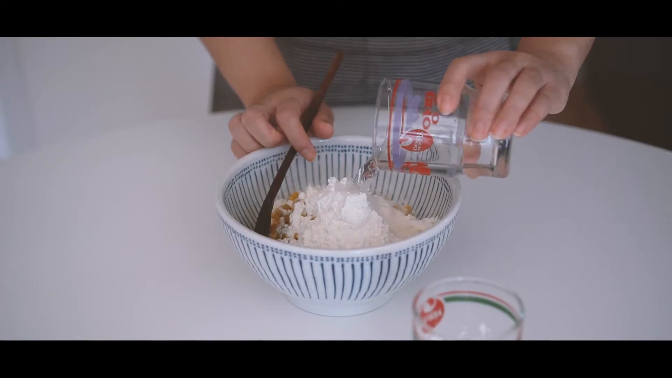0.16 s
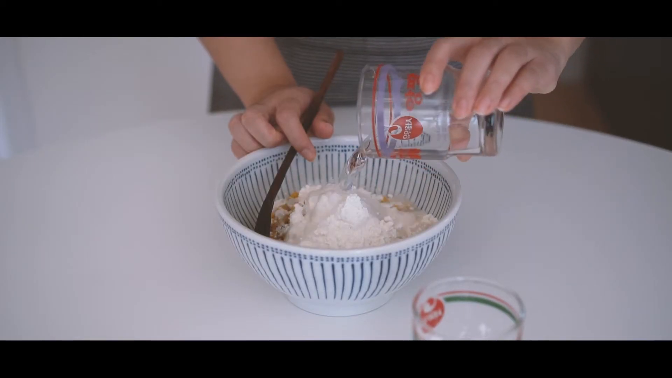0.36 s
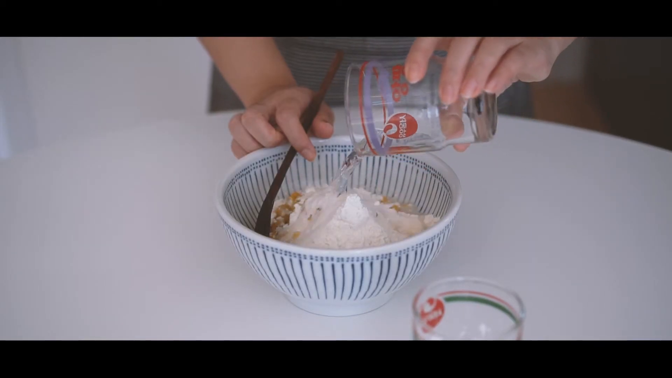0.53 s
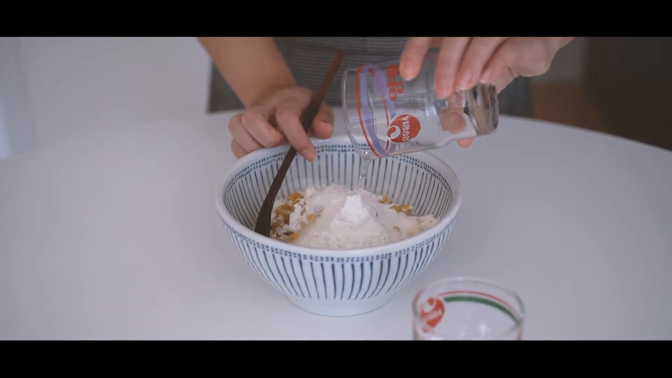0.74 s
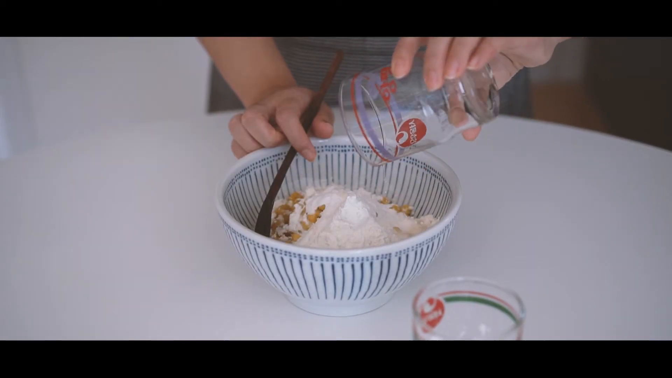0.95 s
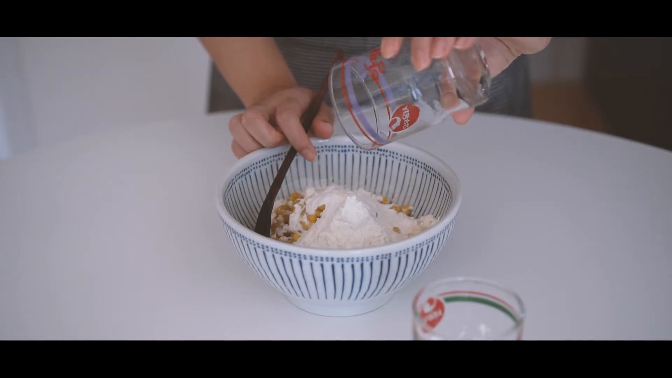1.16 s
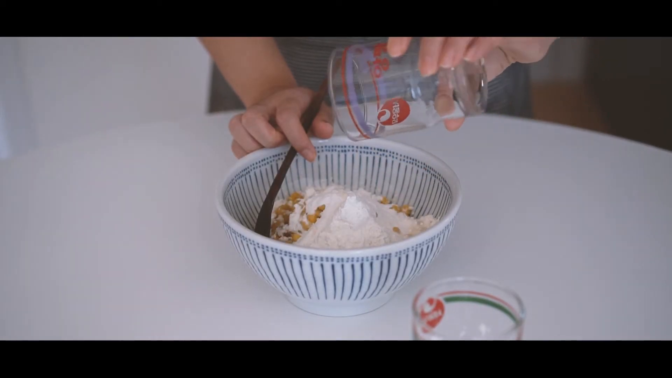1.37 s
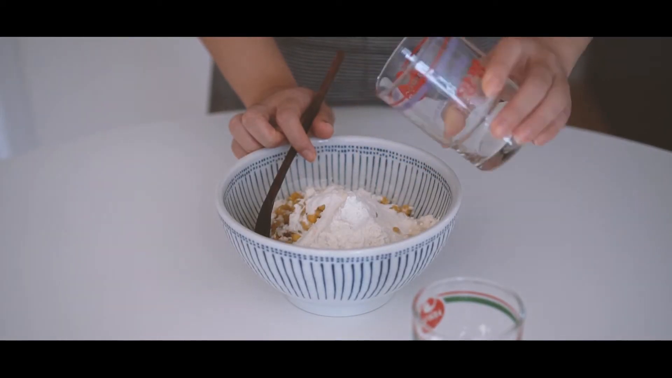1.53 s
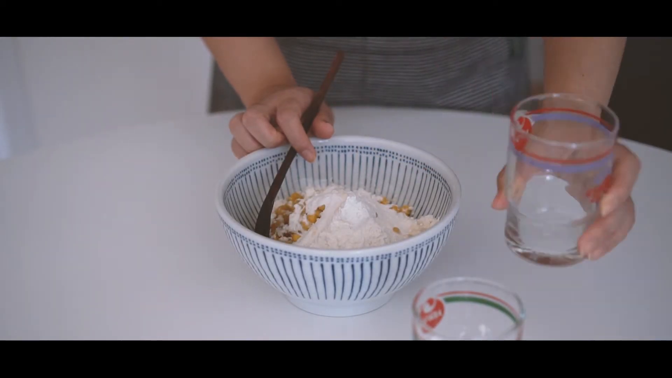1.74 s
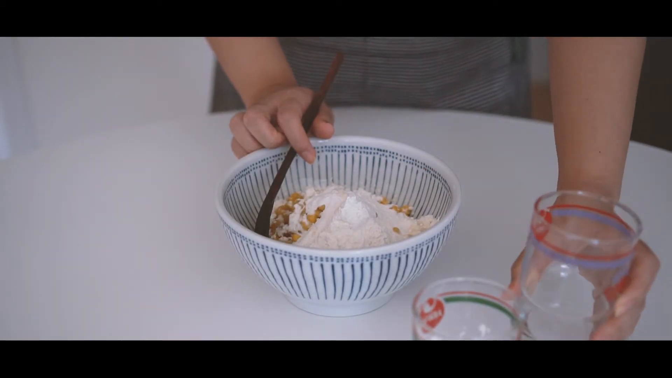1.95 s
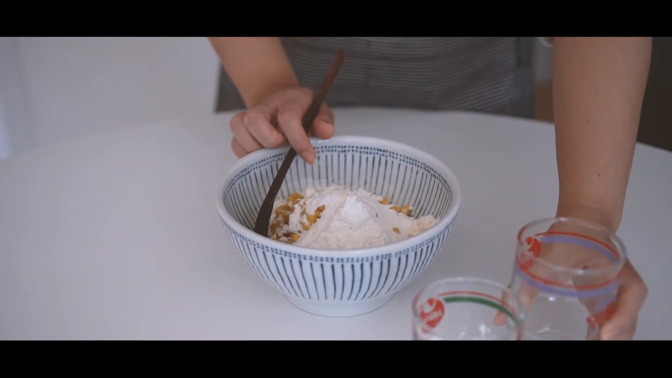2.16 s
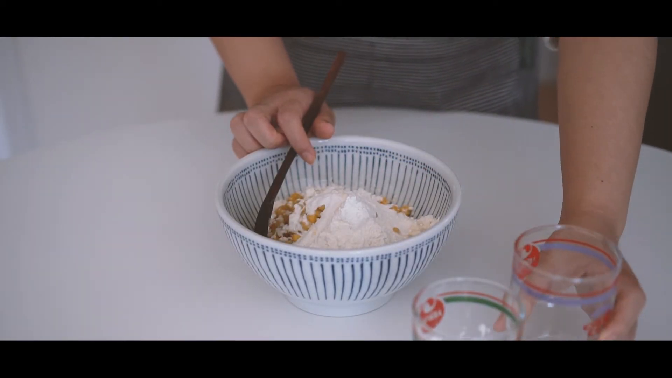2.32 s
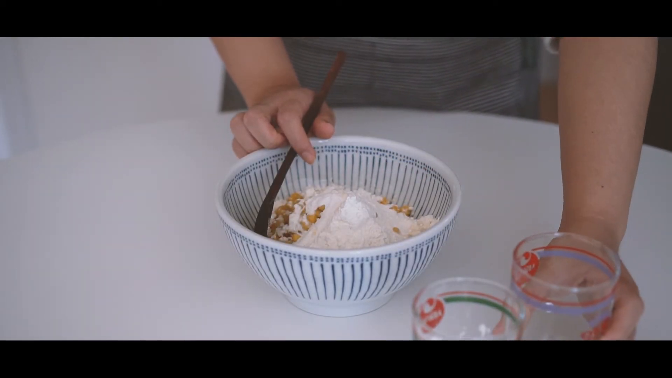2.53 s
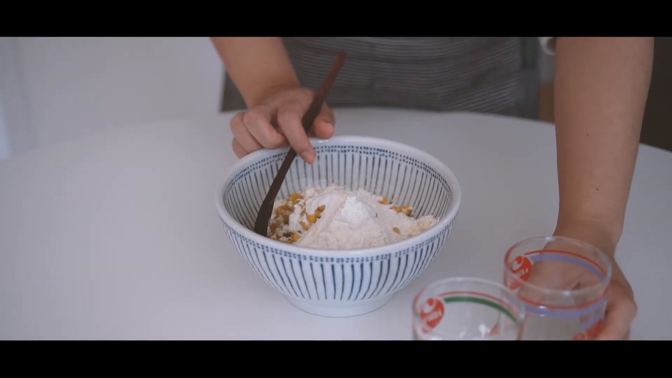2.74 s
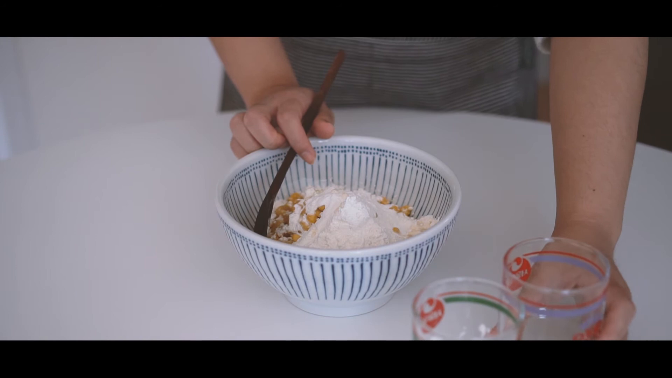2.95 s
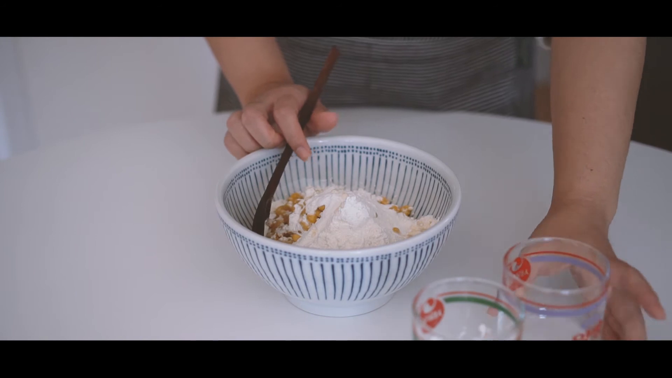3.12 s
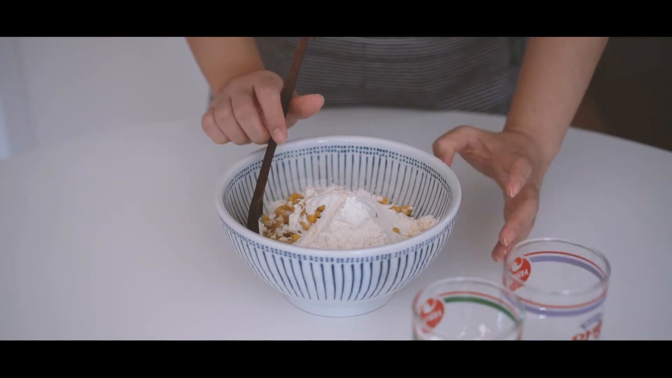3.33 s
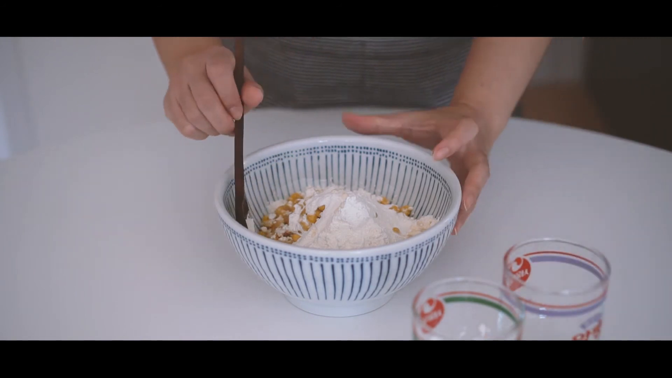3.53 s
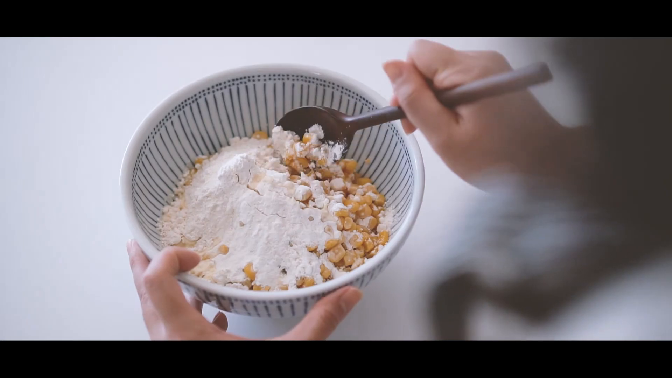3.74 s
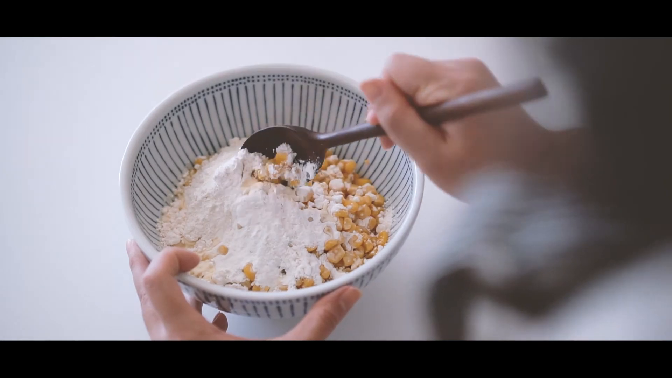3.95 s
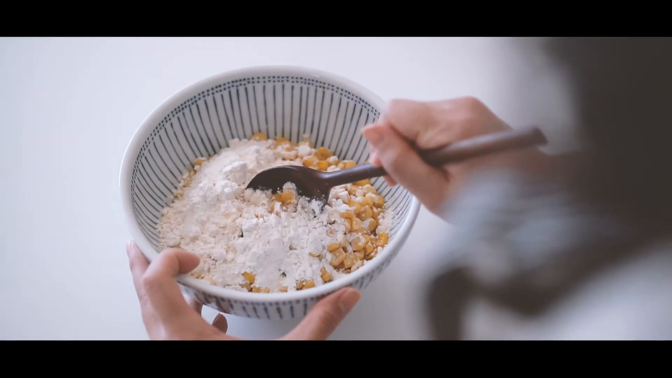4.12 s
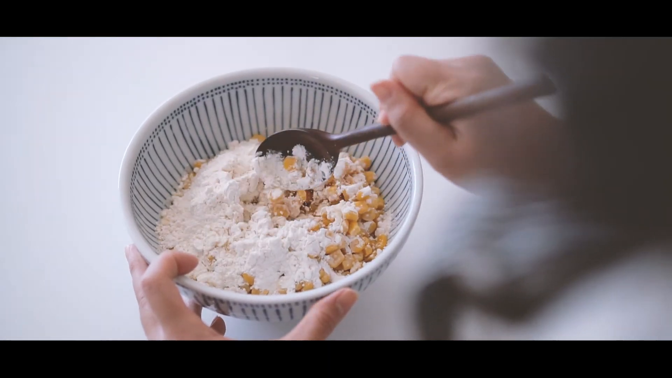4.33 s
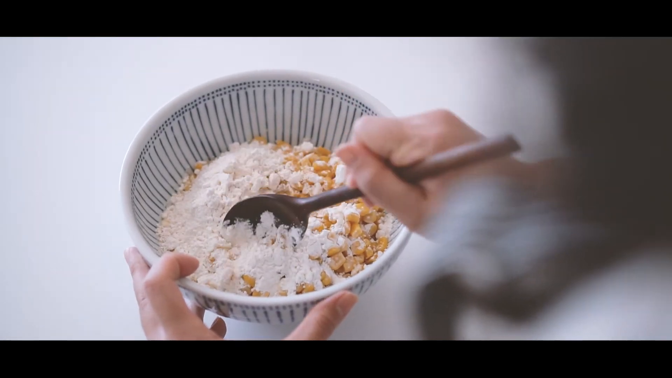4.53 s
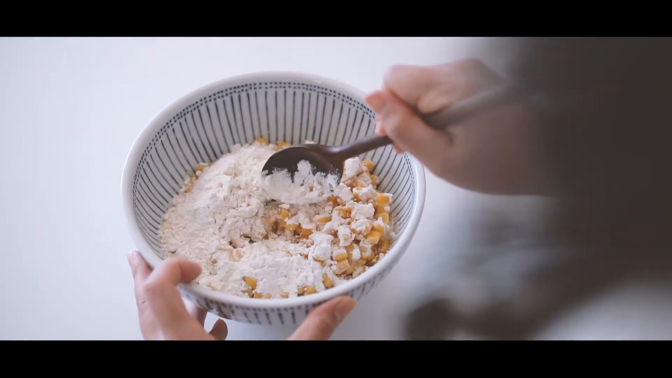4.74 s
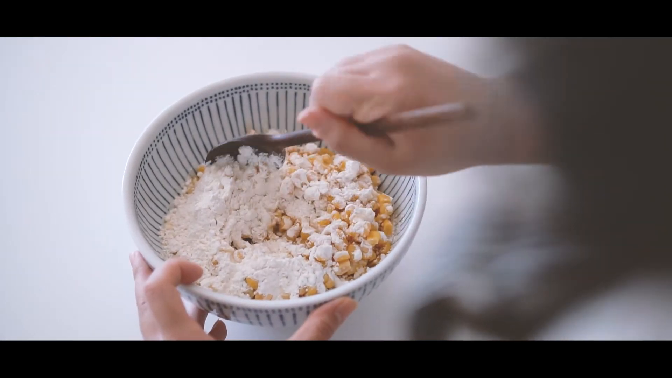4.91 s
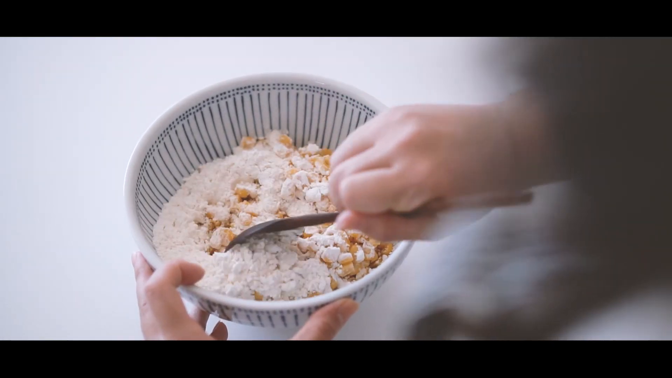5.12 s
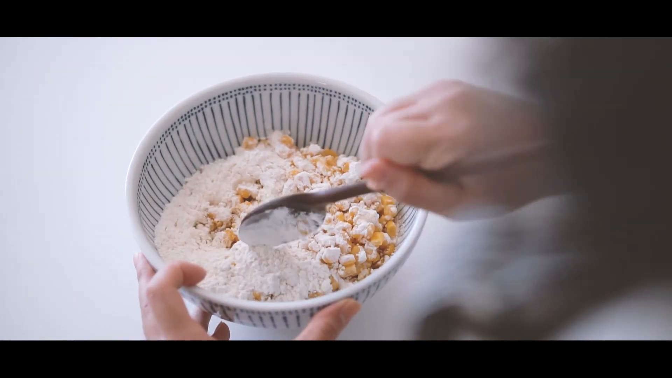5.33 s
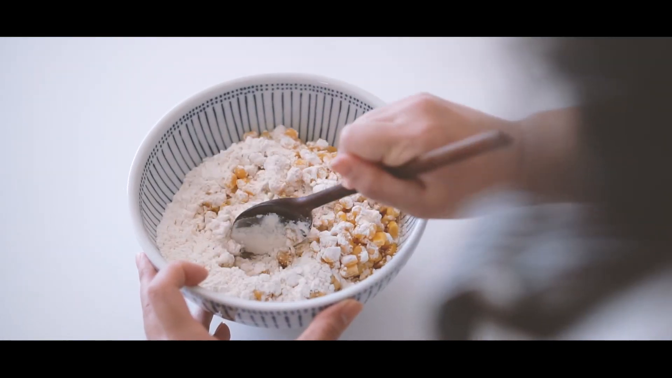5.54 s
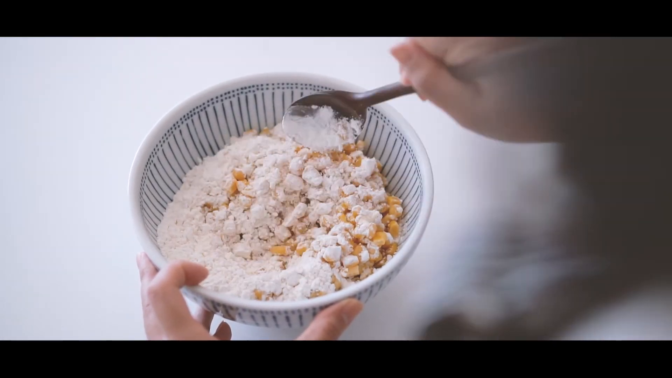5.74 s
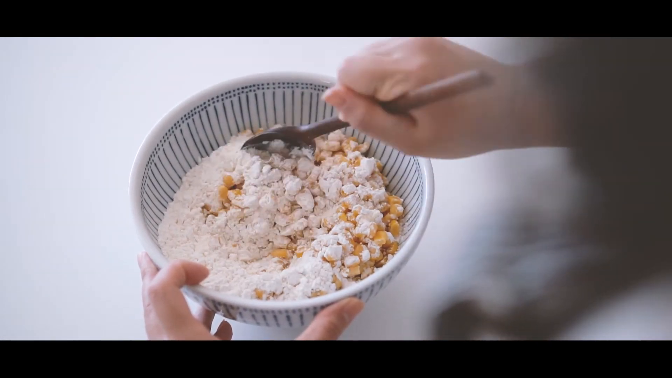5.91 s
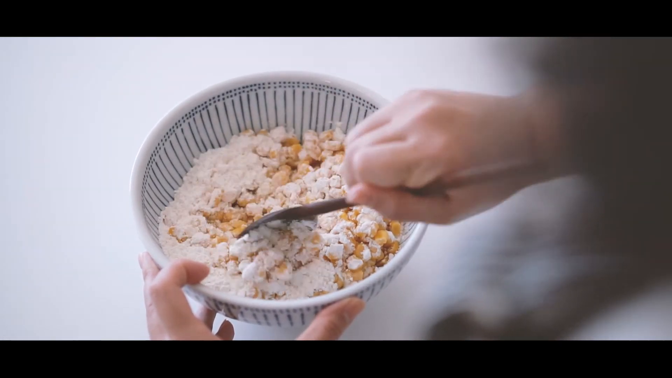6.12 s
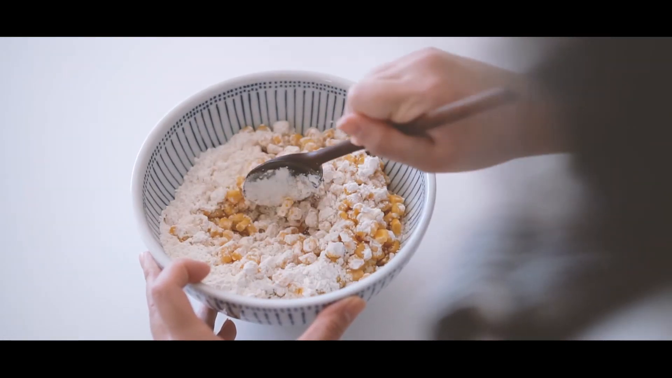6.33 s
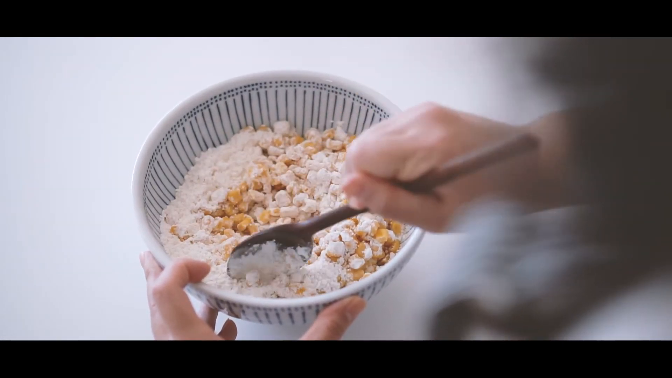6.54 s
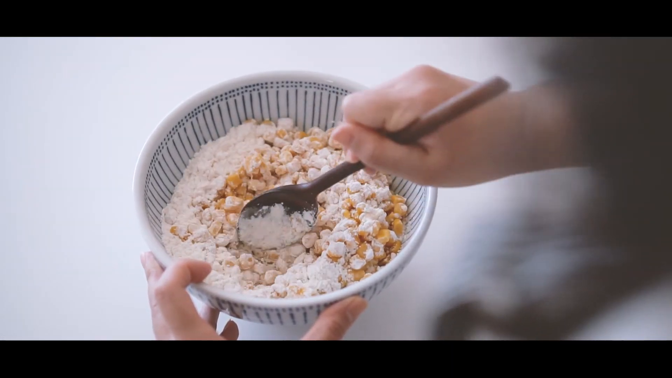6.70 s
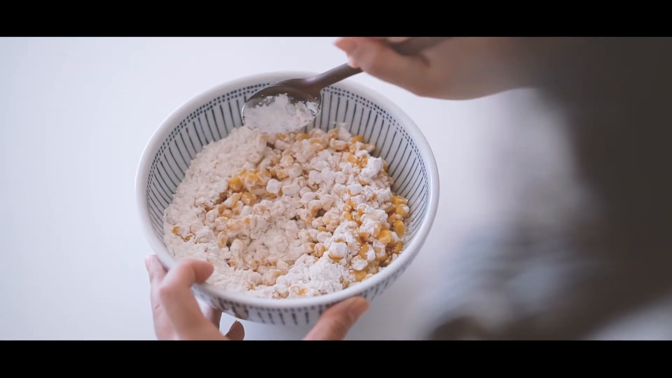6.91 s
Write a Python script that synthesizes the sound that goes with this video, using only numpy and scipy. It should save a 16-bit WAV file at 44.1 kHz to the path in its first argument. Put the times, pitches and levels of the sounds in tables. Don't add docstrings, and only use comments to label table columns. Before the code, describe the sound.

A glass jar knocks, water trickles onto flour, a tumbler lands hard and rocks, then a spoon stirs crunchy crumbs in a ceramic bowl.

```python
import sys
import numpy as np
from scipy import signal
from scipy.fft import next_fast_len
from scipy.io import wavfile
from scipy.ndimage import uniform_filter1d

SR = 44100
rng = np.random.default_rng(int(sys.argv[2]) if len(sys.argv) > 2 else 0)


def volts_from_db(level):
    exponent = np.asarray(level, float) / 20
    return 10 ** exponent


def transcribe(signal):
    frames = np.atleast_2d(signal).T
    limited = np.clip(frames, -1, 1)
    pcm = np.round(limited * 32767).astype(np.int16)
    wavfile.write(sys.argv[1], SR, pcm)


N = 311787

# [t/s, blow level/dB, contact/ms, place on the body 0-3, crack level/dB]
JAR_KNOCKS = [
    (0.0002, -21, 0.063, 0.12, 2.5),
    (0.03, -26.5, 0.15, 0.35, 3.5),
    (.049, -41, 0.089, 0.8, 2),
    (0.078, -43, 0.17, 0.23, 4),
]
TAP_KNOCKS = [
    (0.1993, -28, 0.086, 0.11, -2.5),
]
TUMBLER_KNOCKS = [
    (2.8203, -6, 0.043, 0.052, -5),
    (2.8222, -17.5, 0.035, 1.29, 0),
    (2.851, -19, 0.15, 0.58, 9.5),
]
ROCKING_KNOCKS = [
    (2.9185, -7.5, 0.31, 0.16, -22),
    (2.9225, -9.5, 0.29, 0.29, -18),
    (2.9277, -16, 0.13, 0.53, 3.5),
    (2.9305, -8, 0.18, 0.13, -10.5),
    (2.939, -18.5, 0.25, 0.17, -17),
]
BOWL_KNOCKS = [
    (.598, -34.5, 0.36, 0.2, -1.5),
    (4.4617, -20.5, 0.19, 0.16, -7),
    (4.632, -20, 0.21, 0.17, -11),
    (4.9425, -30, 0.51, 0.18, -1),
    (5.86, -44, 0.2, 0.39, -5),
    (6.27, -36.5, 0.53, 0.12, -7),
    (6.9305, -22.5, 0.24, 0.16, -6),
]
# [f/Hz, level/dB, t60/s]
JAR_MODES = [(143, -9, 0.3), (275, -2, 0.021), (392, -1.5, 0.06), (456, -2, 0.11), (584, 3, 0.098),
             (609, -4, 0.26), (688, -1, 0.13), (808, -5.5, 0.077), (890, 10.5, 0.013), (950, 5.5, 0.059),
             (1035, -13, 0.069), (1148, -3.5, 0.15), (1316, -13, 0.077), (1403, -7, 0.11),
             (1620, -19, 0.07), (2300, -14, 0.18), (2500, -14, 0.14)]
TAP_MODES = [(306, -2.5, 0.12), (420, 1, 0.053), (462, -1, 0.14), (592.5, 5.5, 0.099), (613, 5, .12),
             (683, -4, 0.13), (847, 4, 0.035), (967, 3.5, 0.062), (1410, 0, 0.025), (1600, -12, .05),
             (1750, -17, .05), (2070, -20, .04), (2330, -8, .025), (2730, -18, .03)]
TUMBLER_MODES = [(140.7, -14.5, 0.33), (301.7, -5, 0.24), (315.4, -6, 0.42), (393, -13.5, .2),
                 (439.3, -4, 0.13), (538, 4.5, 0.066), (707, -11, 0.09), (790, -4, 0.04), (922, -5, .15),
                 (971, 1.5, 0.057), (1061, -5, 0.25), (1128, 1.5, 0.059), (1238, 0, 0.047),
                 (1270, -12, 0.1), (1339, 4, 0.056), (1440, -8, 0.15), (1580, -23.5, .05),
                 (1645, -9.5, 0.075), (1790, -4, 0.032), (2060, -2, 0.043), (2200, -31.5, 0.038),
                 (2430, -7.5, 0.027), (2690, -21, 0.036), (2900, -7, 0.02), (3130, -23, 0.036),
                 (3600, -32, 0.016), (3620, -24, 0.055), (4610, -37, 0.034), (4970, -28.5, .03)]
ROCKING_MODES = [(142.6, -25, 0.32), (215, -18, 0.028), (330, -7, 0.21), (390, -2, 0.11), (479, 0.5, 0.068),
                 (538, -4, 0.11), (569, -1.5, 0.05), (651, -2, 0.2), (752, -4, 0.11), (788, -7.5, 0.078),
                 (880, -9, 0.079), (948, -16, 0.19), (1130, -3.5, 0.23), (1244, -0.5, 0.042),
                 (1518, -7, 0.093), (1660, -15, 0.056), (1836, -6.5, 0.021), (2490, -10.5, 0.027)]
BOWL_MODES = [(127.5, -5.5, 0.11), (214, 3.5, 0.038), (278, 2, 0.056), (334, 0, 0.069), (440, 5, 0.11),
              (543, -5, 0.34), (594, 12.5, 0.038), (794, -27.5, 0.05), (1066, 5, 0.019), (1370, -4, 0.027),
              (404, -19, 0.095), (464, -4, 0.15)]
# [delay/s, level/dB]
JAR_ECHOES = [(0.0126, -7)]
TAP_ECHOES = [(.0119, 1.5), (.0155, -6), (.027, -15)]
TUMBLER_ECHOES = [(0.0135, -2), (.031, -12)]
ROCKING_ECHOES = [(0.0132, -10.5)]
BOWL_ECHOES = [(.012, -1), (0.0187, -5.5), (0.0353, -18)]
# [f/Hz, t60/s, level/dB]
ROOM_TAIL = [(149.4, 0.62, -3), (358, 0.41, 3), (1128, 0.5, 3.5), (2300, 0.46, 2), (4820, 0.46, -0.5)]
# [t/s, level/dB, f/Hz]
TUMBLER_RING = [
    (2.975, -37, 1133),
    (2.975, -37, 1142),
    (2.975, -45, 1176),
]

# [t/s, peak level/dB, centre f/Hz]
DROPS = [(.308, -45, 7300), (.308, -49.5, 12600), (.3303, -50, 7150), (.3495, -48.5, 5000),
         (.3885, -54, 4200), (.4732, -48, 7100), (.498, -52, 8150), (.5324, -48, 10500),
         (.5533, -49.5, 10000), (.593, -48.5, 4660), (.598, -36.5, 8100), (.6214, -43.5, 3870),
         (.6295, -40, 8000), (.647, -42, 7720), (.6754, -54.5, 9800), (.69, -48, 10800),
         (.7181, -36.5, 8350), (.708, -52, 7800), (.7265, -41.5, 9500), (.732, -50, 6000),
         (.7444, -51, 10500), (.7771, -52, 7800), (.7935, -47, 6900), (.8024, -56, 10300),
         (.8794, -48, 6540), (.904, -48, 4520), (.97, -50.5, 4930), (.974, -48.5, 10000),
         (1.0071, -56, 7640), (1.1624, -58.5, 5110)]
# [t/s, level/dB, f/Hz]
BUBBLES = [(.2693, -64, 1580), (.3495, -57, 3020), (.3885, -52, 2900), (.4732, -63, 2980),
           (.3085, -55, 2960), (.341, -55, 1900), (.357, -57, 3000), (.498, -60, 2050), (.531, -50, 2300),
           (.5533, -48, 2030), (.593, -42, 1900), (.593, -52, 2720), (.6214, -43.5, 2860),
           (.6295, -44, 1620), (.647, -44, 1780), (.6754, -58, 1730), (.6888, -48, 2130),
           (.7325, -39, 2880), (.732, -33.5, 2170), (.7444, -57, 2480), (.7771, -43, 1740),
           (.7935, -47, 2080), (.8024, -55, 2390), (.84, -50, 1710), (.8784, -45, 1900), (.9596, -45, 2980)]
# [t/s, level/dB, f/Hz]
CUPS = [(.36, -61, 8000), (.533, -62, 11100), (.6, -48, 8100), (.602, -52, 6660), (.682, -60, 5400),
        (.7275, -43.5, 9400), (.729, -50, 10200), (.755, -58, 9650), (.794, -54, 6840), (.803, -54, 7600),
        (.87, -57, 7600), (.5, -59, 2000), (.652, -52, 1500), (.74, -50, 2500), (.77, -50, 1900),
        (.8, -56, 2390), (.872, -52, 2600)]
# [t/s, level/dB, f/Hz]
POCKETS = [(.734, -51, 2455), (.744, -60, 2340), (.756, -58, 2600), (.765, -56, 1783), (.795, -57, 2400),
           (4.1, -70, 3380), (4.15, -71, 3380), (4.2, -67, 3380)]
# [peak t/s, fizz level/dB, large-bubble share/dB]
GUSHES = [
    (.47, -80, 13),
    (.6, -64, 6.5),
    (.66, -74, 6),
    (.735, -70, 10),
    (.81, -85, 18.5),
    (.89, -88, 22),
]
# [t/s, peak level/dB, centre f/Hz]
CRUMB_CRACKS = [
    (1.706, -56, 7960),
    (1.9786, -49, 6260),
    (3.0485, -51.5, 10400),
    (3.2799, -52, 7410),
                (3.6796, -51, 8020), (3.6994, -53.5, 8120), (3.767, -45, 6600), (3.766, -48.5, 12600),
          (3.78, -57, 7480), (3.873, -50.5, 6400), (4.124, -53, 6520), (4.1724, -55, 12600),
          (4.181, -53, 7100), (4.227, -50.5, 7760), (4.292, -55, 12600), (4.3006, -47.5, 8300),
          (4.7671, -55.5, 7630), (4.788, -58, 7400), (4.909, -45.5, 7600), (4.944, -49.5, 7950),
          (5.1074, -51.5, 12600), (5.151, -47, 8340), (5.276, -48, 9400), (5.442, -48.5, 11600),
          (5.4486, -44.5, 8650), (5.5516, -52.5, 6920), (5.58, -49, 7500), (5.6444, -47.5, 8250),
          (5.9107, -45, 7340), (5.998, -50, 9920), (6.1553, -48.5, 8000), (6.7194, -54, 4600),
          (6.8907, -53, 8260)]
# [t/s, peak level/dB, centre f/Hz]
SHORT_SNAPS = [(3.69, -51, 4100), (3.695, -59, 14500), (3.709, -57, 14200), (3.783, -57, 11000),
               (4.18, -51, 14200), (4.2, -55, 4200), (4.24, -58, 8000), (4.253, -57, 7500),
               (4.301, -47, 11300), (4.308, -58, 14500), (5.122, -58, 12000), (5.1425, -45, 12700),
               (5.19, -57, 7200), (5.4475, -40, 12600), (5.552, -51, 11500), (5.584, -56, 7000),
               (5.733, -52, 14000), (5.919, -57, 5700), (5.943, -58, 11500), (5.948, -64, 7800),
               (6.107, -57, 8300), (6.147, -58, 14800), (6.76, -59, 5000), (6.863, -59, 8250),
               (.27, -60, 8500), (.33, -59, 10300), (.392, -56, 11300), (.4875, -56, 13000),
               (.568, -53, 9000), (.592, -50, 9000), (.629, -48, 12000), (.646, -50, 11900),
               (.879, -53, 11500)]
# [t/s, level/dB, f/Hz]
KERNELS = [(3.0485, -43, 1940), (3.2799, -44.5, 2400), (3.6805, -46, 1780), (3.6994, -46, 3600),
           (3.766, -41, 3580), (3.8711, -39.5, 3300), (4.124, -46, 2820), (4.3006, -50, 3400),
           (4.944, -49, 2100), (5.151, -50, 1960), (5.4424, -41.5, 1800), (5.4472, -44, 2580),
           (5.542, -50, 3000), (5.559, -42, 2900), (5.562, -51, 2300), (5.5792, -58, 2060),
           (5.6444, -47, 2000), (5.9115, -33, 2140), (6.7194, -47, 1910), (4.143, -50, 2200),
           (5.123, -48, 3300), (5.965, -48, 1900), (6.03, -46, 1900), (5.92, -43, 2800), (6.76, -50, 2820)]
# [start t/s, length/s, hiss level/dB, drag over hiss/dB]
STROKES = [(3.01, 0.25, -66.5, -2), (3.352, 0.11, -70.5, -1), (3.658, 0.2, -73, 8.5),
           (4.05, .17, -85.5, 18), (4.187, 0.16, -76, 2), (4.543, .06, -74, -8), (4.627, .11, -72, 5),
           (4.742, .06, -72, 1), (5.108, 0.13, -76, 10), (5.403, 0.26, -77, 10), (5.608, 0.17, -73, 3),
           (5.892, 0.037, -68.5, 8), (5.913, 0.13, -73.5, 10.5), (6.08, .1, -76, 4),
           (6.272, 0.14, -72, 5.5), (6.61, 0.067, -68.5, 4.5), (6.746, 0.14, -72.5, 4.5)]

# [t/s, level/dB]
DRAUGHT = [(3.1, -62), (3.17, -66), (3.32, -37.5), (3.47, -36), (3.69, -37), (3.73, -29), (4.03, -28),
           (4.09, -39), (4.16, -22.5), (4.35, -30), (4.76, -30.5), (4.81, -48), (4.87, -28), (5.53, -30.5),
           (5.66, -37), (5.79, -32.5), (7.02, -28), (7.07, -24)]
# [t/s, level/dB, eddy f/Hz]
PUFFS = [(4.099, -48, 40), (4.268, -46, 46), (4.97, -43, 59), (5.691, -50, 42), (6.079, -46, 70),
         (6.513, -34, 37), (6.512, -40.5, 70), (6.748, -34, 50), (7.05, -52, 70), (7.048, -28.5, 12)]
# [f/Hz, level/dB]
LINES = [(97, -63.5), (145, -69), (458, -69), (2555, -85), (13870, -84)]
# [f/Hz, density/dB per Hz]
HISS_SPECTRUM = [(58, 11), (76, -13.5), (130, -6.5), (240, -6), (500, -11.5), (1000, -18), (2000, -28),
                 (2600, -31.5), (3400, -32), (5000, -36), (8000, -37), (12000, -39), (16000, -45.5)]


def unit(x):
    return x / np.sqrt(np.mean(x ** 2))


def band(x, lo_hz, hi_hz, order=2):
    return signal.sosfilt(signal.butter(order, [lo_hz, min(hi_hz, .45 * SR)], "band", fs=SR, output="sos"), x)


def noise(lo_hz, hi_hz, order=2):
    return unit(band(rng.standard_normal(N + SR), lo_hz, hi_hz, order)[SR:])


def walk(rate):
    hold = int(SR / rate)
    levels = np.repeat(rng.standard_normal(N // hold + 1), hold)
    return unit(uniform_filter1d(uniform_filter1d(levels, hold), hold)[:N])


def add(out, s, x):
    i = int(round(s * SR))
    x, i = x[max(-i, 0):], max(i, 0)
    out[i:i + len(x)] += x[:len(out) - i]


def knocks(hits, modes, crack_hz, sign):
    out, t = np.zeros(N), np.arange(SR // 2) / SR
    hz, db, t60 = np.transpose(modes)[:, :, None]
    rings = volts_from_db(db) * np.sin(2 * np.pi * hz * t) * np.exp(-np.log(1000) * t / t60)
    crack = band(1. * (t == 0), crack_hz / 2.36, crack_hz * 1.3)
    crack /= np.abs(crack).max()
    for s, blow_db, contact_ms, place, crack_db in hits:
        push = t[:256] * np.exp(-t[:256] * 1000 / contact_ms)
        share = np.cos(place * np.sqrt(hz[:, 0]) / 4) * sign ** np.arange(len(hz))
        body = 0.37 * share @ rings + volts_from_db(crack_db) * crack
        add(out, s, volts_from_db(blow_db) * signal.fftconvolve(body, push / push.sum()))
    return out


def room(x, wet_db, echoes):
    t = np.arange(SR // 2) / SR
    diffuse = rng.standard_normal(len(t))
    tail = np.zeros(len(t))
    for hz, t60, db in ROOM_TAIL:
        tail += volts_from_db(db) * band(diffuse, hz / 1.65, hz * 1.665) * np.exp(-np.log(1000) * t / t60)
    tail *= np.clip(t / 0.004, 0, 1)
    reply = volts_from_db(wet_db) * tail / np.sqrt(np.sum(tail ** 2))
    reply[0] += 1
    wall = np.exp(-2 * np.pi * 1900 * t[:64])
    for delay_s, db in echoes:
        add(reply, delay_s, volts_from_db(db) * wall / wall.sum())
    return signal.fftconvolve(x, reply)[:N]


def snaps(events, bursts, ms, edge_db):
    out, t = np.zeros(N), np.arange(bursts.shape[1]) / SR
    fade = 0.44 * np.exp(-t * 1000 / ms) + volts_from_db(-19.5) * np.exp(-t * 1000 / 5.2)
    bursts = 2.3 * (t == 0) + bursts * fade
    edges = band(bursts, 10000, 16000)
    for (s, db, hz), burst, edge in zip(events, bursts, edges):
        crack = band(burst, hz / 1.13, hz * 1.1, order=1)
        crack = crack / np.abs(crack).max()
        add(out, s, volts_from_db(db) * (crack + volts_from_db(edge_db) * edge / np.abs(edge).max()))
    return out


def pops(events, ms, glide=0.3):
    out, t = np.zeros(N), np.arange(int(ms * SR / 125)) / SR
    for s, db, hz in events:
        ring = np.sin(2 * np.pi * hz * t * (1 + glide * t))
        add(out, s, volts_from_db(db) * ring * np.exp(-t * 1000 / ms))
    return out


def grit(per_s, spread_db):
    return (rng.random(N) < per_s / SR) * volts_from_db(spread_db * rng.exponential(size=N)) * rng.standard_normal(N)


def fizz():
    rise_db_per_s, small_fade_db_per_s, large_fade_db_per_s = 398, 91, 141
    s, db, large_db = np.transpose(GUSHES)[:, :, None]
    since = np.arange(N) / SR - s
    rise = rise_db_per_s * np.minimum(since, 0)
    after = np.maximum(since, 0)
    large = volts_from_db(db + large_db + rise - large_fade_db_per_s * after).sum(axis=0)
    small = volts_from_db(db + rise - small_fade_db_per_s * after).sum(axis=0)
    out = large * unit(band(grit(1500, 3.27), 1530, 3040))
    return out + small * unit(band(grit(4300, 1.6), 4700, 9900))


def rub():
    airy_db, airy_db_per_s = -14, 56.5
    cavity, airy, drag = np.zeros((3, N))
    for s, length, db, drag_db in STROKES:
        stroke = volts_from_db(db) * np.hanning(int(length * SR)) ** 0.44
        add(cavity, s, stroke)
        add(airy, s, volts_from_db(airy_db + airy_db_per_s * length) * stroke)
        add(drag, s, volts_from_db(drag_db) * stroke)
    grains = grit(2700, 1.53)
    out = cavity * unit(band(grains, 7170, 8850))
    out += airy * unit(band(grains, 11000, 15800))
    return out + drag * unit(band(grains, 796, 2520))


def even(x):
    evenness = 0.76
    swelling = np.abs(signal.hilbert(x, next_fast_len(N))[:N])
    return unit(x / (swelling + 0.33) ** evenness)


def air():
    flutter_db, flutter_slope, puff_cycles = -25.5, 0.53, 2.9
    s, db = np.transpose(DRAUGHT)
    draught = volts_from_db(np.interp(np.arange(N) / SR, s, db))
    out = draught * even(noise(6.5, 16, order=3))
    out += volts_from_db(flutter_db) * draught ** flutter_slope * even(noise(17, 34, order=4))
    for s, db, hz in PUFFS:
        t = np.arange(int(puff_cycles / hz * SR)) / SR
        puff = np.hanning(len(t)) * np.sin(2 * np.pi * hz * t)
        add(out, s - t[-1] / 2, np.sqrt(2) * volts_from_db(db) * puff)
    return out


def fridge():
    mains_hz, hum_db, dip_s, dip_half_width_s, dip_db = 50.5, -49, 3.74, 0.36, -7.5
    whine_db, whine_full_s, whine_rise_db_per_s = -62.5, 4.85, 6
    t = np.arange(N) / SR
    hum = volts_from_db(hum_db + dip_db * np.exp(-((t - dip_s) / dip_half_width_s) ** 2))
    whine = volts_from_db(whine_db + whine_rise_db_per_s * np.minimum(t - whine_full_s, 0))
    out = hum * unit(np.sin(2 * np.pi * mains_hz * t) + .25 * noise(46, 56))
    out += whine * unit(np.sin(2 * np.pi * 237 * t + .5 * walk(3)) + .2 * noise(230, 244))
    for hz, db in LINES:
        level = np.sqrt(2) * volts_from_db(db + 2.9 * walk(2.7))
        out += level * np.sin(2 * np.pi * hz * t + 0.25 * walk(2.3))
    return out


def fan():
    return volts_from_db(-83.0 + 1.5 * walk(1.8)) * noise(2480, 2640)


def hiss():
    out, swell = np.zeros(N), walk(1.0)
    f, density_db = np.transpose(HISS_SPECTRUM)
    for hz in 70 * 2 ** np.arange(0, 8, .5):
        level_db = np.interp(np.log(hz), np.log(f), density_db) + 10 * np.log10(hz)
        level_db = level_db + .3 * swell + .9 * walk(8)
        out += volts_from_db(level_db) * noise(hz / 2 ** 0.29, hz * 2 ** 0.34)
    return volts_from_db(-55.5) * unit(out)


def scene():
    jar = knocks(JAR_KNOCKS, JAR_MODES, 970, sign=-1.004)
    tap = knocks(TAP_KNOCKS, TAP_MODES, 1120, sign=-1.04)
    tumbler = -knocks(TUMBLER_KNOCKS, TUMBLER_MODES, 1530, sign=-0.995)
    rocking = knocks(ROCKING_KNOCKS, ROCKING_MODES, 2900, sign=-1.117)
    bowl = knocks(BOWL_KNOCKS, BOWL_MODES, 595, sign=-0.96)
    near = room(jar, -8, JAR_ECHOES) + room(tap, -14, TAP_ECHOES) + room(bowl, -6.5, BOWL_ECHOES)
    near += room(tumbler, -10.5, TUMBLER_ECHOES) + room(rocking, -12.5, ROCKING_ECHOES)
    near += pops(TUMBLER_RING, 60, glide=0)

    bursts = rng.standard_normal((120, 600))
    near += snaps(DROPS, bursts, 1.01, -19)
    near += snaps(CRUMB_CRACKS, bursts[::-1], 1.0, -12.5)
    near += snaps(SHORT_SNAPS, bursts[40:], 0.5, -27)
    near += pops(BUBBLES, 1.7, glide=12) + pops(KERNELS, 0.41, glide=12)
    near += pops(POCKETS, 20) + pops(CUPS, 3.1, glide=1.8)
    near += fizz() + rub() + air()
    return (near + fridge() + fan() + hiss())[None]


def low_pass(x):
    return signal.sosfilt(signal.butter(12, 15830, fs=SR, output="sos"), x)


def record(dry):
    return low_pass(dry)


dry = scene()
out = record(dry)
transcribe(out)
```